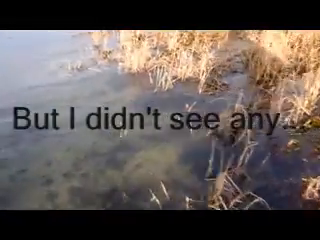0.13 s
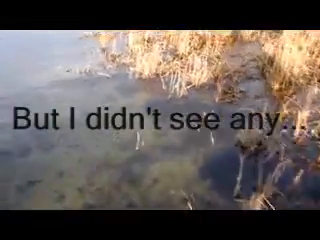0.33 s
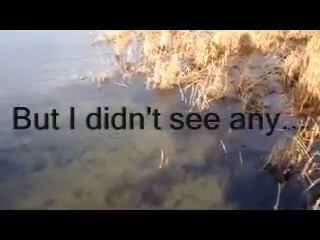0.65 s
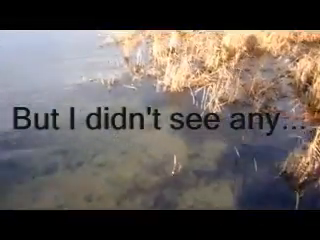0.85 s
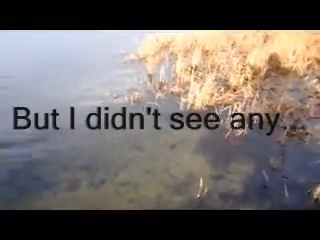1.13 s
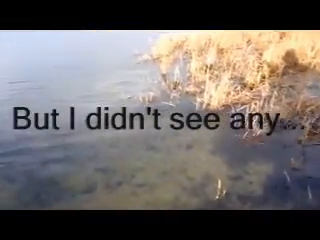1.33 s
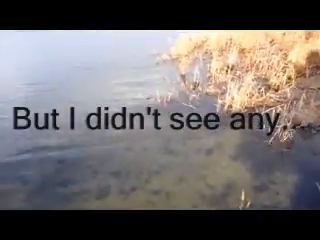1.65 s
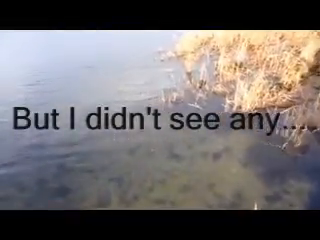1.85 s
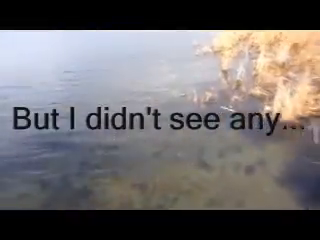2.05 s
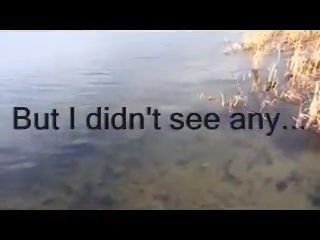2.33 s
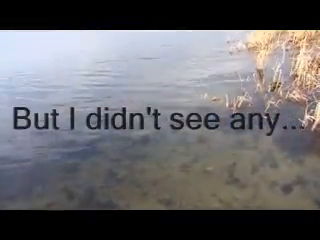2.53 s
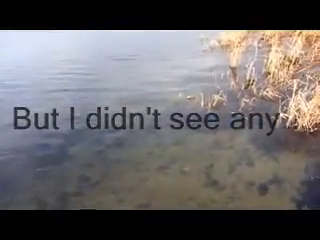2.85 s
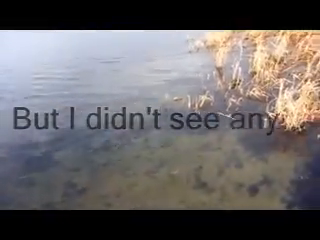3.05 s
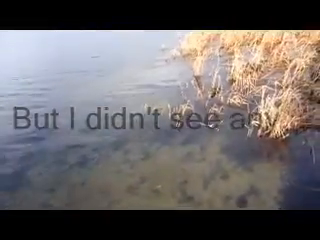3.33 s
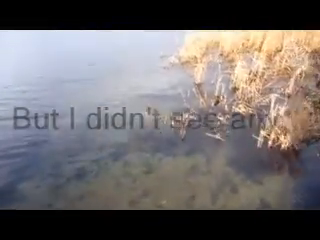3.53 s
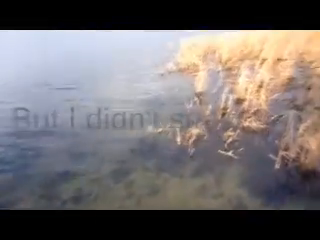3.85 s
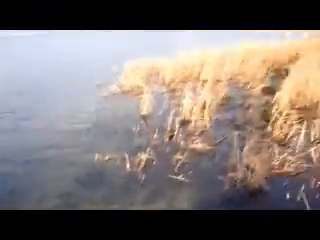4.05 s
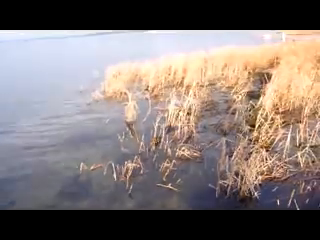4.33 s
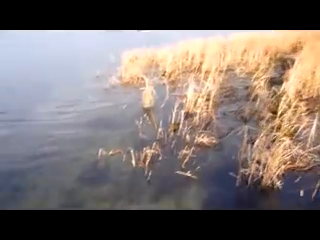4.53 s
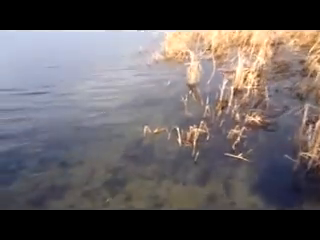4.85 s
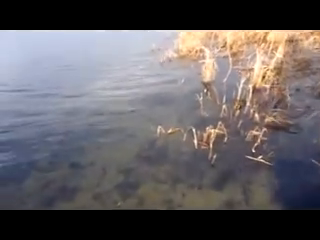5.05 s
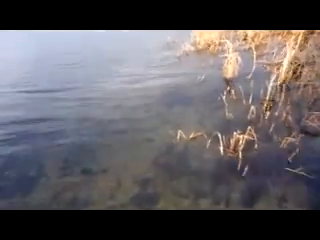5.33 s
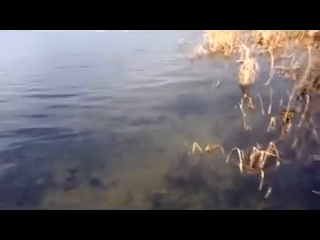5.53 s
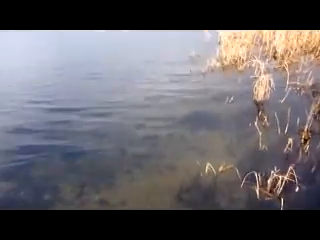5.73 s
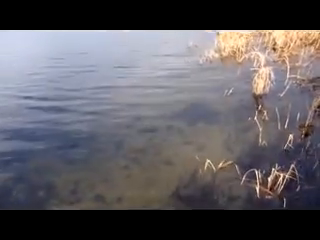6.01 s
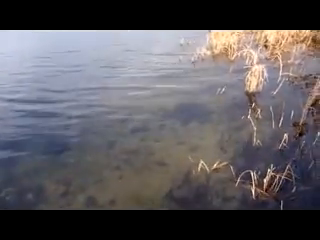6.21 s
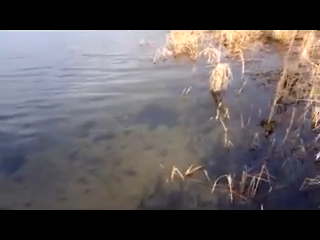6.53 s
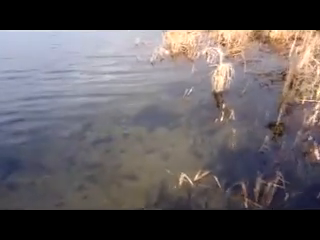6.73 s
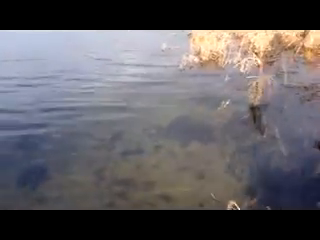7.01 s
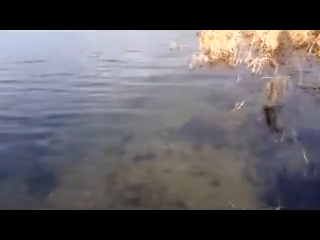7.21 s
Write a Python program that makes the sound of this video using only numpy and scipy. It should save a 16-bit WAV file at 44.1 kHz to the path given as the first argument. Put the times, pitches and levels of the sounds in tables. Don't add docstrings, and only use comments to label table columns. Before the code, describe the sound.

Small waves lap and gurgle among dry reeds at a lake shore, with hollow glugs, ticking drops and a bright fizz. Light wind thumps low on the microphone, mostly in the first three seconds. Around four seconds the recorder's plastic case snaps loudly and creaks very briefly. Lapping continues, with a busy splashy patter near six and a half seconds. Open air, close small handheld microphone, faint hiss and high whine.

```python
import sys
import numpy as np
from scipy import signal
from scipy.fft import rfft, irfft, next_fast_len
from scipy.io import wavfile
from scipy.ndimage import uniform_filter1d

SR = 44100
rng = np.random.default_rng(int(sys.argv[2]) if len(sys.argv) > 2 else 0)


def to_wav(sig):
    pcm = np.clip(np.atleast_2d(sig), -1, 1) * 32767
    pcm = np.round(pcm).astype(np.int16)
    wavfile.write(sys.argv[1], SR, pcm.T)


def ratio_of_db(decibels):
    return 10 ** (np.asarray(decibels, float) / 20)


N = 325458

# (time [s], peak level [dB], pitch [Hz])
SINKING_DROPS = [(1.288, -38, 2600), (1.404, -38, 1700), (1.5743, -36, 2100), (1.874, -41, 1670),
                 (2.1079, -23, 3690), (2.16, -37, 2600), (2.183, -39, 3120), (2.3121, -38, 3800),
                 (2.7147, -41, 1640), (2.9966, -41, 1900), (3.1238, -41, 1700), (3.2602, -32.5, 2370),
                 (3.2844, -33, 2190), (3.715, -38, 1750), (3.7663, -39, 3560), (3.8018, -44, 1874),
                 (4.2255, -41, 4000), (4.581, -34, 2380), (4.803, -47.5, 1705), (4.981, -37.5, 3630),
                 (5.0012, -38, 3660), (5.0532, -44, 1790), (5.142, -28.5, 2530), (5.235, -41, 2300),
                 (5.3704, -38.5, 2334), (5.5055, -41.5, 1780), (5.5948, -46, 2010), (6.663, -36, 3450),
                 (7.0334, -43, 2000), (7.0521, -34, 3560), (3.177, -28.5, 3460), (3.079, -35, 3780),
                 (3.387, -40.5, 2460), (1.5135, -40, 2300), (3.9462, -41, 3500), (4.042, -44, 6500)]
# (time [s], peak level [dB], pitch [Hz])
STEM_SPLATS = [(0.5476, -40, 3520), (0.594, -41, 3600), (0.6145, -40.5, 1980), (0.637, -38, 3690),
               (1.2336, -47.5, 2260), (1.702, -38, 3200), (3.07, -36, 1310), (3.2312, -32, 3100),
               (3.3372, -33, 3600), (3.855, -48, 1690), (4.729, -43, 1505), (4.905, -35, 3590),
               (5.2747, -39, 2510), (5.3006, -36, 1850), (5.3186, -35.5, 2140), (5.609, -44, 1750),
               (5.622, -42, 3600), (6.175, -43, 1800), (6.4216, -42, 1424), (6.4655, -39, 2170),
               (6.496, -29.5, 2380), (6.554, -45, 1500), (7.1618, -40, 1890), (7.1934, -41, 1800),
               (7.2153, -43, 2530)]
# (time [s], peak level [dB], pitch [Hz])
SPRAY_PATTER = [(.322, -49, 3400), (.342, -46, 3500), (.46, -44, 2150), (.483, -49, 3600),
                (.548, -49, 2400), (.9333, -49, 1950), (1.031, -39, 2900), (1.052, -39, 5050),
                (1.143, -40, 4000), (1.152, -44, 1930), (1.1832, -48, 2150), (1.302, -38, 2350),
                (1.352, -40, 3600), (1.518, -38, 3480), (1.587, -41, 4560), (2.118, -47, 3700),
                (3.012, -43, 3500), (3.126, -40, 3700), (3.162, -49, 2570), (3.204, -46, 3700),
                (3.252, -38, 3700), (3.2787, -39, 3900), (3.3141, -42, 1880), (3.59, -44, 2550),
                (3.688, -41, 4570), (4.61, -42, 1900), (4.6611, -45, 3500), (4.714, -46, 3720),
                (4.755, -42, 2100), (4.85, -44, 1840), (4.872, -44, 2200), (4.92, -44, 2150),
                (4.952, -43, 2050), (4.975, -39.5, 2130), (5.0093, -39, 3740), (5.0746, -43, 2200),
                (5.1415, -39, 3500), (5.1934, -42, 2600), (5.2388, -43, 3520), (5.2632, -46, 3600),
                (5.272, -43, 1550), (5.3046, -46, 3600), (5.334, -44, 3650), (6.4123, -44, 3640),
                (6.4302, -37, 3570), (6.445, -42, 3800), (6.463, -39, 3500), (6.478, -37, 2150),
                (6.4941, -33, 3660), (6.528, -43, 3530), (6.5544, -40, 3530), (6.5664, -38, 3560),
                (6.5909, -52, 3570), (6.612, -42, 3210), (6.6328, -39, 3530), (6.6901, -43, 3390),
                (6.922, -42, 2600), (7.116, -46, 3450), (7.225, -43, 3450), (7.243, -44, 3500)]
# (pitch [Hz], width [Hz], level [dB])
PORT_RESONANCES = [(2300, 930, 4.5), (3560, 320, -2), (5840, 2800, -4.5)]


def rms_one(x):
    return x / np.sqrt(np.mean(x ** 2) + 1e-20)


def in_time(rows):
    s, *columns = np.transpose(rows)
    return [np.interp(np.arange(N) / SR, s, c) for c in columns]


def drift(rate):
    r = np.exp(-80 * np.pi * rate / SR)
    chance = rng.standard_normal(N // 40 + 2002)
    slow = signal.lfilter([1], [1, -2 * r, r * r], chance)[2000:]
    return np.interp(np.arange(N) / 40, np.arange(len(slow)), rms_one(slow))


def coloured(x, spectrum):
    size = next_fast_len(N)
    hz, db = np.transpose(spectrum)
    bins_hz = np.arange(size // 2 + 1) * SR / size
    shape = np.interp(np.log(bins_hz + 1), np.log(hz), db, left=-80, right=-80)
    return rms_one(irfft(rfft(x, size) * ratio_of_db(shape), size)[:N])


def filtered(x, order, hz, kind="low"):
    return signal.sosfilt(signal.butter(order, hz, kind, fs=SR, output="sos"), x)


def ring(clicks, hz, t60):
    r, w = ratio_of_db(-60 / (t60 * SR)), 2 * np.pi * hz / SR
    return signal.lfilter([0, np.sin(w)], [1, -2 * r * np.cos(w), r * r], clicks + 1e-18)


def resonate(x, peaks):
    out = 0
    for k, (hz, width, db) in enumerate(peaks):
        t60 = np.log(1000) / np.pi / width
        out = out + ratio_of_db(db) * (-1) ** k * ring(x, hz, t60)
    return out


def add(out, s, hz, rise, envelope):
    at = round(s * SR)
    t = np.arange(len(envelope)) / SR
    tone = envelope * np.sin(2 * np.pi * np.cumsum(hz * 2 ** (rise * t)) / SR)
    out[at:at + len(t)] += tone[:N - at]


def swarm(per_s, low_hz, high_hz, cycles, spread_db):
    sizes = ratio_of_db(spread_db * np.minimum(rng.exponential(1, N), 4)) * rng.choice([-1, 1], N)
    bubbles = sizes * (rng.random(N) < per_s / SR)
    dealt = rng.integers(0, 20, N)
    out = np.zeros(N)
    for k, hz in enumerate(np.geomspace(low_hz, high_hz, 20)):
        out += ring(bubbles * (dealt == k), hz, cycles / hz) * hz ** 0.34
    return rms_one(out)


def far_lake():
    # (frequency [Hz], level per Hz [dB])
    spectrum = [(15, -47), (25, -13), (91, -6.5), (178, -19), (237, 4), (316, -9.5), (822, 2.5), (1420, -7),
                (1850, -6), (2920, -9.5), (3530, -9.5), (6430, -13.5), (7600, -16.5), (9880, -48),
                (16700, -120)]
    return ratio_of_db(-56.0) * coloured(rng.standard_normal(N), spectrum)


def whistles():
    # (time [s], pitch [Hz], level [dB])
    glides = [
        [(.05, 11600, -81.5), (.12, 9800, -84.5)],
        [(.19, 10000, -85.5), (.25, 11400, -84), (.33, 10700, -84), (.42, 10870, -84)],
        [(.5, 9800, -86), (.62, 9800, -81.5)],
        [(5.745, 10000, -82), (5.77, 10400, -83), (5.79, 10900, -81), (5.815, 10950, -82)],
        [(2.55, 9790, -90), (2.73, 9790, -83)],
        [(3.37, 10150, -82), (3.41, 10100, -80), (3.43, 9900, -80)],
        [(3.6, 9790, -88), (3.95, 9790, -88)],
        [(6.25, 9790, -90), (6.52, 9790, -87)],
        [(6.73, 9790, -91), (6.86, 9700, -85)],
        [(1.12, 10900, -78), (1.15, 10000, -82)],
        [(5.852, 12000, -75), (5.868, 10000, -71)],
        [(5.93, 8400, -82), (5.98, 8700, -80), (6.01, 8400, -77)],
        [(6.02, 11510, -79.5), (6.06, 10300, -78.5), (6.18, 9800, -90.5)],
    ]
    out, t = np.zeros(N), np.arange(N) / SR
    for rows in glides:
        hz, db = in_time(rows)
        start, end = rows[0][0], rows[-1][0]
        on = uniform_filter1d(1. * (abs(2 * t - start - end) < end - start), size=200 * 2)
        phase = 2 * np.pi * np.cumsum(hz * ratio_of_db(.04 * drift(40.3))) / SR
        out += on * ratio_of_db(db + 10.5 + 2.5 * drift(30)) * np.sin(phase)
    return out


def circuit():
    # (frequency [Hz], level per Hz [dB])
    hiss_spectrum = [(8000, 3.5), (8900, 4), (10000, 5), (11500, 0.5), (13000, -5), (14500, -17),
                     (15700, -26)]
    hiss_db = -70.5 + 0.19 * (wash()[1] + 58) + 1.35 * drift(60)
    hiss = ratio_of_db(hiss_db) * coloured(rng.standard_normal(N), hiss_spectrum)
    high = filtered(rng.standard_normal(N), 3, [13200, 15400], "band")
    gate = uniform_filter1d(1. * (drift(28) > 1.15), size=200)
    bursts = ratio_of_db(-65.5 + 2.8 * np.minimum(drift(6.0), .5)) * high * gate
    whine_hz = 15625
    whine_db = -80.5 + 16.0 * np.clip(drift(7.0) + .15, -2.5, 0.3)
    whine = ratio_of_db(whine_db) * np.sin(2 * np.pi * whine_hz * np.arange(N) / SR)
    return hiss + bursts + whine + whistles()


def gusts():
    # (time [s], length [s], level [dB])
    blows = [(0.033, 0.336, -65.5), (0.562, 0.039, -57), (0.662, 0.018, -54.5), (0.751, 0.056, -54),
             (0.973, 0.16, -53.5), (1.138, 0.13, -46.5), (1.4, 0.16, -48), (1.616, 0.19, -46),
             (1.818, 0.12, -48.5), (2.01, 0.11, -47), (2.23, 0.13, -48.5), (2.468, 0.07, -49.5),
             (2.55, 0.14, -52), (2.754, 0.1, -51.5), (2.88, 0.15, -60.5), (3.3, 0.13, -63),
             (3.61, 0.16, -63), (4.053, 0.054, -60), (4.592, 0.114, -64), (4.825, 0.041, -60),
             (4.983, 0.06, -61), (5.157, 0.175, -57.5), (5.78, 0.27, -55.5), (6.19, 0.046, -55.5),
             (6.333, 0.095, -60.5), (7.1, 0.35, -64.5)]
    rise_db_per_s, fall_db_per_s, breeze_db = 500, 403, -64.5
    t, level = np.arange(N) / SR, ratio_of_db(breeze_db)
    for s, length, db in blows:
        off_db = np.maximum(rise_db_per_s * (s - t), fall_db_per_s * (t - s - length))
        level = np.hypot(level, ratio_of_db(db - np.clip(off_db, 0, 80)))
    return level


def puffs():
    # (time [s], peak level [dB], pitch [Hz])
    thumps = [(0.593, -27, 218), (0.668, -32, 104), (0.77, -29.5, 117), (0.962, -35, 155),
              (1.146, -32, 108), (1.407, -27, 151), (1.607, -28, 135), (1.893, -20.5, 230),
              (2.006, -25, 148), (2.252, -35, 285), (2.501, -26, 183), (2.788, -29, 198),
              (4.058, -46.5, 72.7), (4.058, -41, 191), (4.817, -35, 275), (5.123, -32, 353),
              (5.846, -29, 164), (5.929, -29.5, 140), (6.09, -36, 112), (6.207, -47, 352),
              (6.415, -32, 352), (6.505, -33.5, 320), (7.006, -35.5, 269), (1.624, -28, 200),
              (1.682, -27, 240), (1.744, -28, 310), (1.77, -26.5, 180), (1.83, -31, 125), (1.942, -29, 135),
              (2.045, -32, 190), (2.08, -31, 190), (2.284, -26, 210), (2.352, -31.5, 280), (2.38, -32, 150),
              (2.413, -36, 150), (2.464, -33, 160), (2.567, -29.5, 165), (2.664, -35, 150)]
    out, t = np.zeros(N), np.arange(int(.05 * SR)) / SR
    for s, db, hz in thumps:
        envelope = ratio_of_db(db + 1.0) * t * hz * np.exp(-t * hz * 1.55)
        add(out, s + 0.00787, hz, -3, envelope * rng.choice([-1, 1]))
    return out


def wind():
    # (frequency [Hz], level per Hz [dB])
    spectrum = [(15, -53), (25, -29), (87, -3.5), (135, 1), (179, 0), (256, -1), (419, -11), (485, -16.5),
                (600, -12), (780, -73), (1320, -120)]
    shared = drift(22)
    rumble = ratio_of_db(0.83 * shared + 2.65 * drift(58.0)) * rng.standard_normal(N)
    flutter = ratio_of_db(0.83 * shared + 2.65 * drift(58.0)) * rng.standard_normal(N)
    split = signal.butter(2, 150, fs=SR, output="sos")
    eddies = signal.sosfiltfilt(split, rumble - flutter) + flutter
    return puffs() + gusts() * coloured(eddies, spectrum)


def case_creak():
    # (time [s], peak level [dB], brightness [dB])
    slips = [(3.9509, -38.2, -14), (3.9587, -36.3, -18), (3.9674, -37.8, -14), (3.9697, -31.0, -7),
             (3.9727, -39.0, -12), (3.9746, -28.5, -9), (3.9794, -39.2, -12), (3.9815, -37.8, -10),
             (3.9829, -32.9, -13), (3.9843, -34.9, -7), (3.9858, -31.2, -6), (3.9883, -28.0, -6),
             (3.9903, -31.6, -4), (3.9911, -27.4, -13), (3.9927, -38.1, -6), (3.9938, -27.6, -8),
             (3.995, -34.3, -8), (3.9975, -14.0, -6), (3.999, -26.5, -6), (3.9999, -29.5, -9),
             (4.0018, -34.2, -3), (4.0034, -24.3, -6), (4.006, -38.5, 3), (4.007, -29.0, -7),
             (4.0083, -20.8, -3), (4.0101, -32.2, -6), (4.0114, -22.3, -7), (4.0127, -27.4, -5),
             (4.0136, -33.3, -5), (4.0145, -32.2, -14), (4.0163, -22.6, -9), (4.0178, -23.0, -7),
             (4.0201, -30.2, -3), (4.0219, -31.8, -9), (4.0236, -31.4, -14), (4.0251, -28.5, -8),
             (4.0258, -36.9, -8), (4.0277, -23.8, -6), (4.0296, -36.6, -4), (4.0326, -30.6, -10)]
    # (time [s], level [dB])
    rubbing = [
        (3.94, -77),
        (3.965, -68),
        (3.99, -60),
        (4.02, -59),
        (4.033, -66),
        (4.037, -82),
    ]
    grit_per_s, grit_db, slip_lag_s = 60, 6, .0002
    near_slips = abs(np.arange(N) / SR - 3.99) < .05
    rub = ratio_of_db(in_time(rubbing)[0]) * rng.standard_normal(N) * near_slips
    rub *= np.where(rng.random(N) < grit_per_s / SR, ratio_of_db(grit_db), 1)
    soft, sharp = np.zeros((2, N))
    for s, db, bright_db in slips:
        at = round((s - slip_lag_s) * SR)
        soft[at], sharp[at] = ratio_of_db(db - 1.5), ratio_of_db(db + bright_db - 0.5)
    creak = rub + filtered(soft, 3, 4600) + filtered(sharp, 3, 4600, "high")
    return creak, rub


def case():
    # (pitch [Hz], width [Hz], level [dB])
    shell_modes = [(1310, 224, -24.5), (2320, 148, -35), (2710, 740, -1.5), (3630, 850, 7.5),
                   (4360, 1080, 6.5), (5990, 537, -5), (11000, 1700, -27)]
    # (delay [s], level [dB])
    echoes = [(.0013, -18), (.0023, -12), (.0038, -25), (.0065, -35)]
    snap_s, snap_db = 3.8972, -5.5
    creak, rub = case_creak()
    snap = np.zeros(N)
    snap[round(snap_s * SR)] = ratio_of_db(snap_db)
    kicks = creak + snap
    for s, db in echoes:
        kicks += ratio_of_db(db) * np.roll(snap, round(s * SR))
    shell = filtered(resonate(kicks, shell_modes), 3, 1000, "high")
    shell = signal.lfilter(*signal.iirnotch(1850, 2.5, fs=SR), shell)
    bending = np.tanh(40 * creak) / 15 + 3 * rub
    return -shell + ratio_of_db(-8.0) * resonate(bending, [(1380, 270, -15.0)])


def case_ticks():
    # (time [s], peak level [dB])
    cracks = [
        (1.3762, -39),
        (1.765, -45),
        (6.1738, -43),
    ]
    out, t = np.zeros(N), np.arange(300) / SR
    for s, db in cracks:
        out[round(s * SR):][:300] += ratio_of_db(db + 9.5 - 60 * t / 0.011) * rng.standard_normal(300)
    return filtered(out, 2, [3600, 6800], "band")


def splashes():
    # (time [s], length [s], level [dB], main pitch [Hz])
    breaks = [(6.41, .075, -55.5, 3500), (6.488, 0.022, -50.5, 2400), (6.51, 0.073, -59, 3400),
              (7.04, 0.032, -57, 1500), (5.22, .028, -56.5, 2300), (5.315, .035, -56, 2100),
              (3.074, .01, -59, 3470), (3.12, 0.016, -55, 1700), (1.13, 0.054, -63, 1960),
              (6.61, .08, -62, 3400)]
    drops_per_s, width = 700, 0.29
    out, t = np.zeros(N), np.arange(N) / SR
    sizes = rng.standard_normal(N) * ratio_of_db(2.0 * np.minimum(rng.exponential(1, N), 2))
    droplets = (rng.random(N) < drops_per_s / SR) * sizes
    for s, length, db, hz in breaks:
        part = slice(round((s - .01) * SR), round((s + length + .02) * SR))
        rise = (t[part] - s) / .006 + .5
        fall = (s + length - t[part]) / .025 + .8
        gate = np.clip(np.minimum(rise, fall), 0, 1)
        narrow = resonate(droplets[part] * gate, [(hz, width * hz, 0)])
        out[part] += ratio_of_db(db) * rms_one(resonate(narrow, [(hz, 2 * width * hz, 0)]))
    return out


def air_pockets():
    # (time [s], peak level [dB], pitch [Hz])
    glugs = [(0.619, -40.5, 786), (0.705, -33.5, 870), (1.1, -42, 994), (1.52, -39.5, 407),
             (1.629, -44, 565), (2.853, -42, 403), (2.949, -41, 378), (3.857, -41, 947), (4.575, -30, 573),
             (4.646, -34, 398), (4.719, -34, 685), (4.905, -40, 520.4), (5.009, -39.5, 367),
             (5.138, -37, 347), (5.23, -43, 328), (5.487, -46, 810), (5.908, -39, 804), (6.396, -46, 401),
             (6.425, -35.5, 400), (6.487, -45, 710), (6.641, -42, 668), (3.232, -39.5, 463),
             (7.042, -39, 1224), (7.161, -39, 583), (.483, -47, 673), (.594, -46, 1060), (.636, -45, 1160),
             (1.269, -43, 970), (1.324, -41, 665), (2.082, -45, 1060), (3.037, -44, 676), (4.676, -43, 535),
             (4.765, -41, 428), (6.398, -40, 813), (6.443, -41, 417), (6.545, -48, 520),
             (6.698, -39.5, 765)]
    out, t = np.zeros(N), np.arange(int(.2 * SR)) / SR
    for s, db, hz in glugs:
        t60 = 0.0824 * (500 / hz) ** 0.24
        add(out, s, hz, 1.5, ratio_of_db(db - 60 * t / t60) * (1 - np.exp(-t / 0.00075)))
    return out


def stem_slaps():
    # (time [s], peak level [dB], pitch [Hz], t60 [s])
    slaps = [(0.647, -24.5, 770, 0.0079), (0.797, -29.5, 721, 0.011), (1.218, -27.5, 756, 0.018),
             (1.233, -33, 678, 0.0185), (1.288, -38, 600, 0.034), (2.11, -28.5, 350, 0.03),
             (6.425, -38, 415, 0.0098), (6.505, -32, 690, 0.015), (7.015, -32, 630, .013),
             (4.906, -33.5, 565, 0.022), (5.096, -33.5, 576, 0.021)]
    out, t = np.zeros(N), np.arange(int(.2 * SR)) / SR
    for s, db, hz, t60 in slaps:
        add(out, s, hz, 3.0, ratio_of_db(db - 1.0 - 60 * t / t60) * (1 - np.exp(-t / 0.00046)))
    return out


def bursting_pockets():
    # (time [s], peak level [dB], pitch [Hz], length [s], rise [octaves/s])
    bloops = [(0.708, -41, 640, .022, 3), (4.705, -32, 610, .011, 2), (4.568, -41, 620, .02, -3),
              (4.637, -43, 520, .014, -12), (2.117, -45.5, 835, 0.039, -1), (2.165, -42, 770, 0.017, 0),
              (2.604, -45, 550, 0.028, -5), (2.878, -47, 560, 0.033, 11), (2.797, -45.5, 890, 0.019, 1),
              (3.139, -37, 666, 0.018, 10), (3.876, -43.5, 780, 0.02, 1.5), (3.923, -48, 1200, 0.029, -2),
              (5.301, -45.5, 952, 0.028, 4), (5.325, -49, 2250, .022, -1), (5.343, -49, 1190, 0.03, -5),
              (5.371, -37, 594, 0.053, 15), (5.533, -41.5, 672, 0.038, 4), (5.6, -50, 660, .04, 3.5),
              (6.184, -39.5, 386, 0.063, 1.5), (6.338, -51.5, 770, 0.1, 1), (7.219, -47, 800, 0.028, 15),
              (7.085, -54, 520, 0.065, -1.5), (3.19, -45, 400, .03, 5.5), (.29, -54, 820, 0.19, 1),
              (7.148, -49, 710, .012, -3), (3.101, -33.5, 589, 0.029, 1.5), (5.82, -53, 950, .1, 1)]
    fade_db, hurry = 9.5, 0.55
    out, t = np.zeros(N), np.arange(int(.2 * SR)) / SR
    for s, db, hz, length, rise in bloops:
        envelope = ratio_of_db(db - fade_db * t / length) * (1 - np.exp(-t / 0.00039))
        envelope *= np.clip((length - t) / 0.0024, 0, 1)
        add(out, s, hz, rise * (1 + hurry * t / length), envelope)
    return out


def drops():
    out, cracks = np.zeros(N), np.zeros(N)
    t = np.arange(int(.2 * SR)) / SR
    t_crack = t[:400]
    ring_cycles, rise_per_cycle, attack_s = 35, 0.005, 0.00081
    crack_shape = ratio_of_db(-60 * t_crack / 0.013) * (1 - np.exp(-t_crack / 0.00055))
    for landings, crack_db in [(SINKING_DROPS, -19), (STEM_SPLATS, -7), (SPRAY_PATTER, -14)]:
        for s, db, hz in landings:
            decay = ratio_of_db(db + 3.8 - 60 * t * hz / ring_cycles)
            add(out, s, hz, rise_per_cycle * hz, decay * (1 - np.exp(-t / attack_s)) ** 2)
            at = round(s * SR)
            cracks[at:at + 400] += ratio_of_db(db + crack_db - 12.5) * crack_shape * rng.standard_normal(400)
    return out + resonate(cracks, PORT_RESONANCES)


def wash():
    # (crest time [s], gurgle level [dB], fizz against gurgle [dB], rise [s], fall [s])
    waves = [(0.1, -56, -4.5, 1, .8), (0.6, -54.5, -2.5, 0.94, 0.23), (1.2, -51, -1.5, 0.26, 1),
             (1.6, -61.5, 8, 0.72, 0.44), (2.15, -59, 2.5, 0.13, 0.55), (2.73, -55.5, -14.5, 0.16, 0.69),
             (3.19, -45, -4.5, 0.34, 0.29), (3.8, -60, 2, 0.97, 0.27), (4.68, -53, -6, 0.73, 0.66),
             (5.08, -52, -5, 0.75, 0.37), (5.55, -68, 10.5, 0.79, .4), (6.1, -52.5, -3, 1, 1),
             (6.51, -49, -1, 0.14, 0.45), (7.07, -56.5, -3, .12, 1)]
    swell_db, calm_db = 11.5, -67
    spray_db, spray_t60_s = -27.5, 0.3
    t, kicks = np.arange(N) / SR, np.zeros(N)
    gurgle, fizz = np.full((2, N), ratio_of_db(calm_db))
    for s, db, fizz_db, rise, fall in waves:
        swell = ratio_of_db(db - swell_db * np.maximum((s - t) / rise, (t - s) / fall))
        gurgle = np.hypot(gurgle, swell)
        fizz = np.hypot(fizz, swell * ratio_of_db(fizz_db))
    for landings in (SINKING_DROPS, STEM_SPLATS, SPRAY_PATTER):
        for s, db, hz in landings:
            kicks[round(s * SR)] = ratio_of_db(db + spray_db)
    spray = signal.lfilter([1], [1, -ratio_of_db(-60 / (spray_t60_s * SR))], kicks + 1e-18)
    return 20 * np.log10([gurgle, np.hypot(fizz, spray)])


def lapping():
    # (frequency [Hz], level per Hz [dB])
    fizz_spectrum = [(1200, -7), (2000, 8), (2900, -12), (3600, -20.5), (5000, -7), (6500, -3), (7500, -2)]
    gurgle_db, fizz_db = wash()
    gurgle = swarm(700 * ratio_of_db(3 * drift(9.7)), 356.5, 1407, cycles=20.4, spread_db=1.0)
    ticks = swarm(900 * ratio_of_db(4.3 * drift(15)), 1504, 5160, cycles=45, spread_db=3.6)
    drips_per_s = 90 * ratio_of_db(0.6 * (fizz_db + 57.5) + 3.7 * drift(6.7))
    trickle = swarm(drips_per_s, 1525, 3850, cycles=42.0, spread_db=1.5)
    bursts = (rng.random(N) < 2200 * ratio_of_db(4.0 * drift(20)) / SR) * np.clip(rng.standard_normal(N), -1.6, 1.6)
    bursts *= ratio_of_db(2.6 * np.minimum(rng.exponential(1, N), 2.6))
    crackle = rms_one(resonate(bursts, PORT_RESONANCES))
    splash = coloured(rng.standard_normal(N), fizz_spectrum) * ratio_of_db(5.04 * np.minimum(drift(32), 1.8))
    fizz = ratio_of_db(-6.0) * ticks + ratio_of_db(-5.5) * crackle + ratio_of_db(-9.0) * splash
    return ratio_of_db(gurgle_db - 0.96) * gurgle + ratio_of_db(fizz_db - 2.0) * fizz + ratio_of_db(-66.5) * trickle


def scene():
    skin = ratio_of_db(2.0 * np.minimum(drift(70), .3))
    bubbles = air_pockets() + stem_slaps() + bursting_pockets() + drops()
    water = lapping() + skin * bubbles + case_ticks()
    near = filtered(filtered(water, 6, 6600), 3, 230, "high")
    leak = ratio_of_db(-20) * filtered(water, 4, 9000, "high")
    return (far_lake() + near + leak + wind() + case() + circuit() + splashes())[None]


def band_limit(x):
    return signal.sosfilt(signal.butter(12, 16240, fs=SR, output="sos"), x)


def record(dry):
    notch_hz, cutoff_hz = 7930, 15700
    notched = signal.lfilter(*signal.iirnotch(notch_hz, 6.0, fs=SR), dry)
    mix = signal.sosfilt(signal.ellip(12, .5, 70, cutoff_hz, fs=SR, output="sos"), notched)
    return band_limit(mix)


dry = scene()
out = record(dry)
to_wav(out)
```